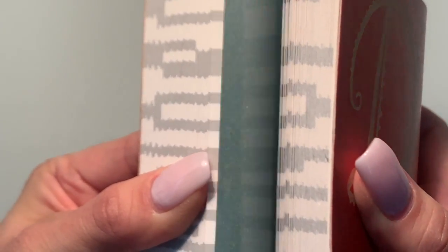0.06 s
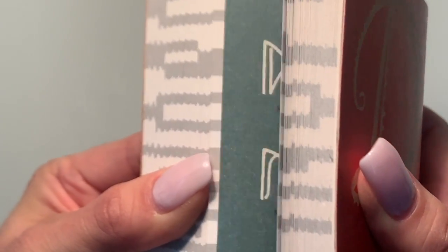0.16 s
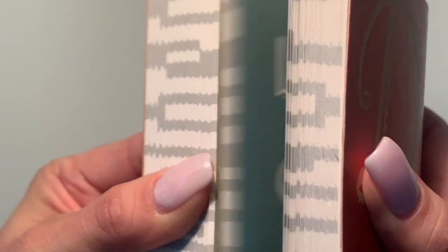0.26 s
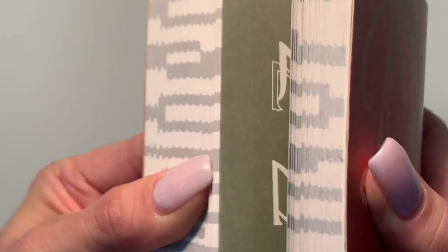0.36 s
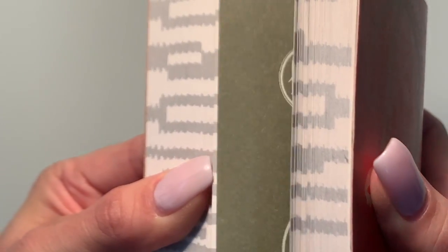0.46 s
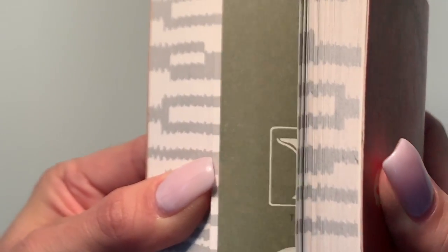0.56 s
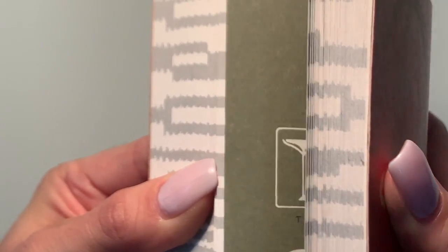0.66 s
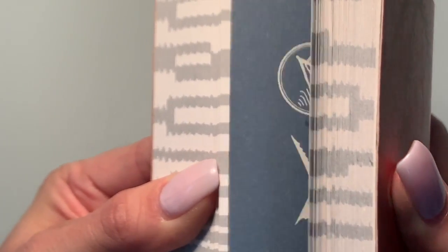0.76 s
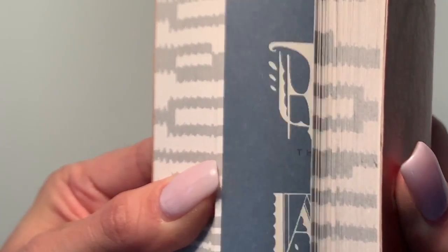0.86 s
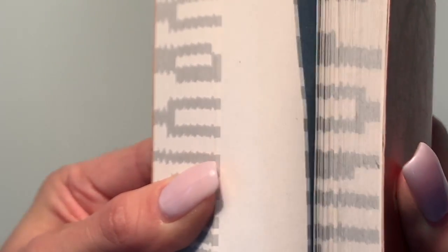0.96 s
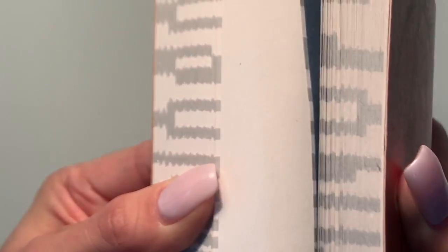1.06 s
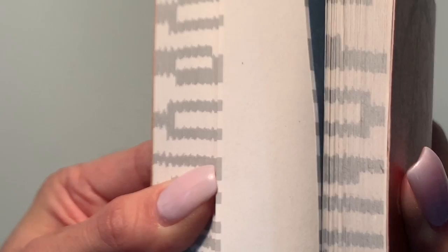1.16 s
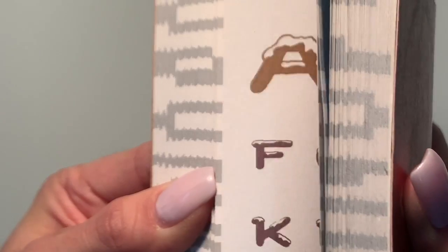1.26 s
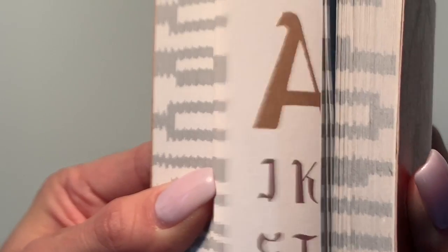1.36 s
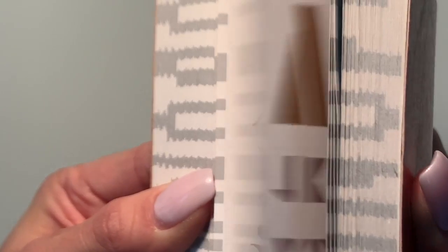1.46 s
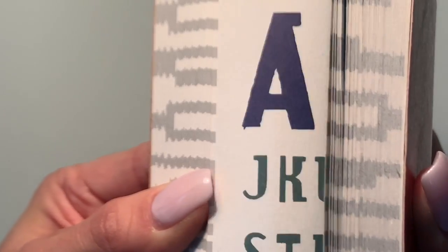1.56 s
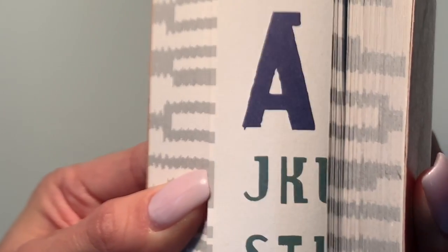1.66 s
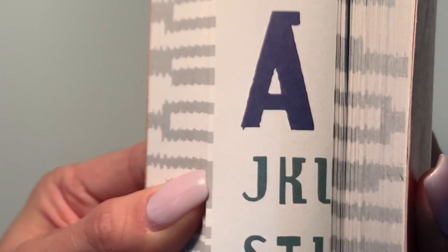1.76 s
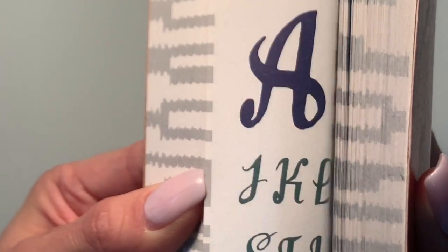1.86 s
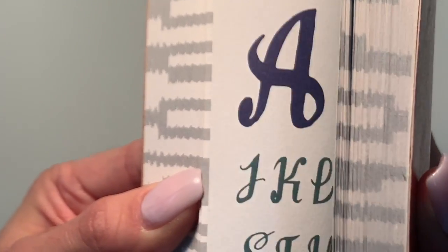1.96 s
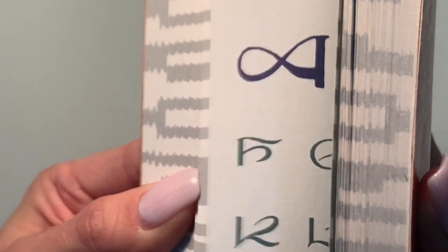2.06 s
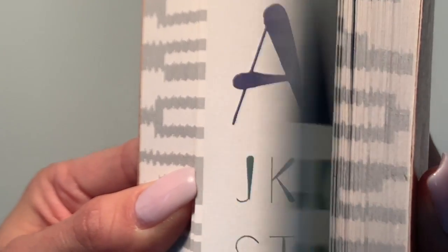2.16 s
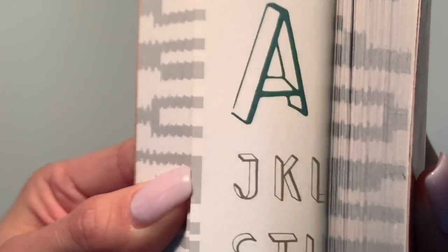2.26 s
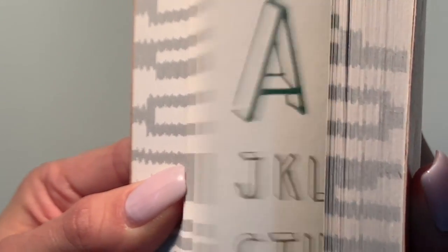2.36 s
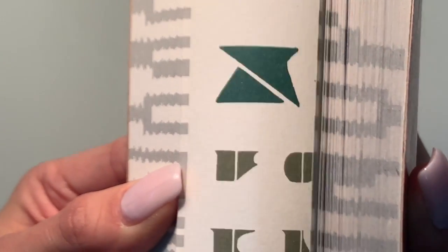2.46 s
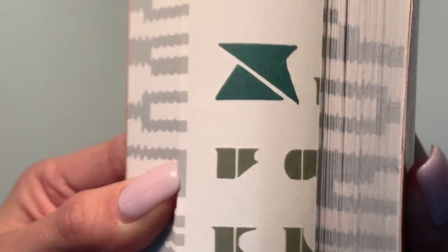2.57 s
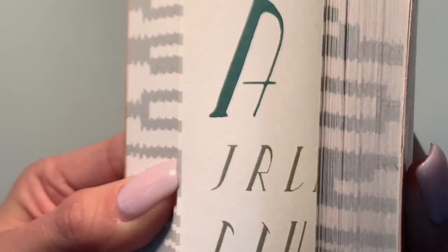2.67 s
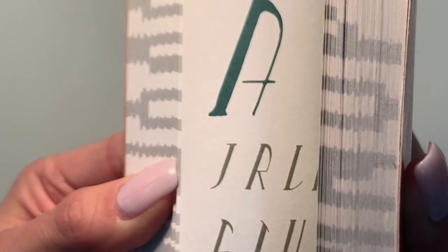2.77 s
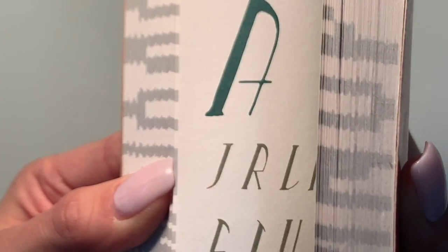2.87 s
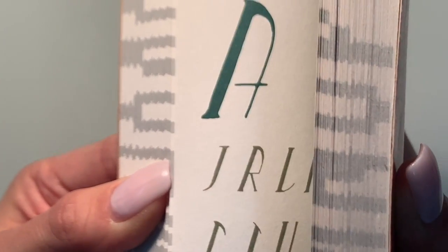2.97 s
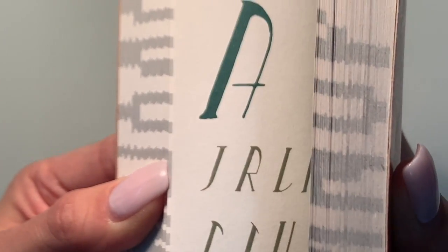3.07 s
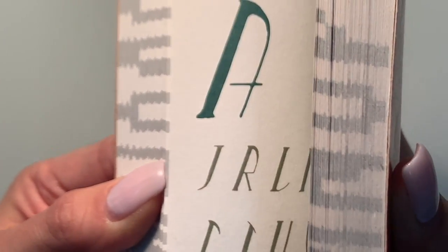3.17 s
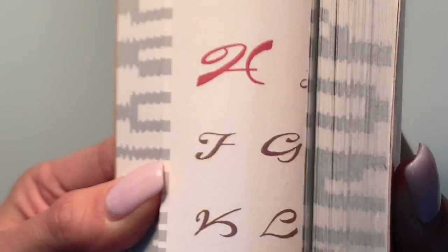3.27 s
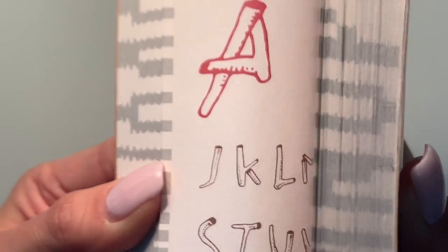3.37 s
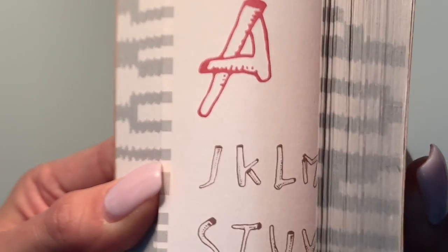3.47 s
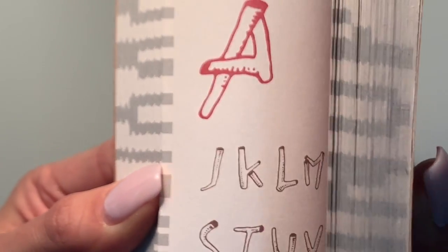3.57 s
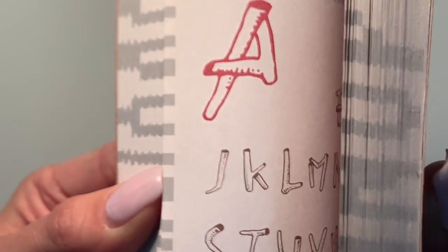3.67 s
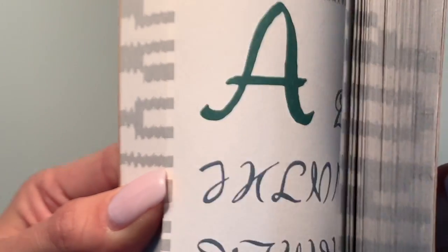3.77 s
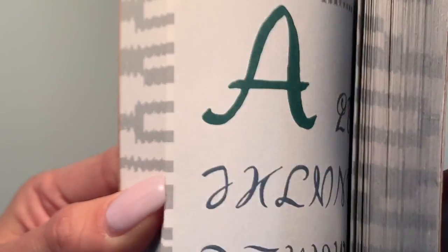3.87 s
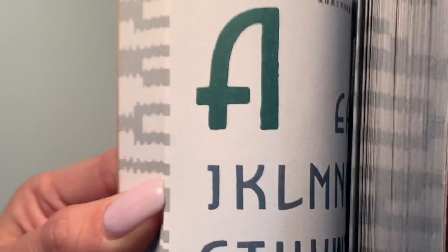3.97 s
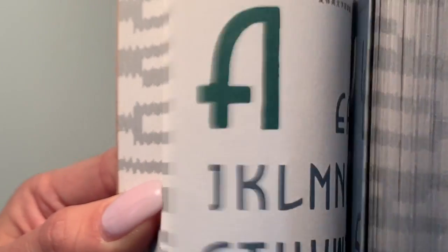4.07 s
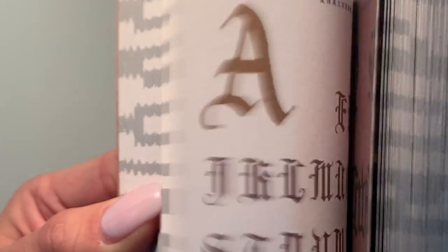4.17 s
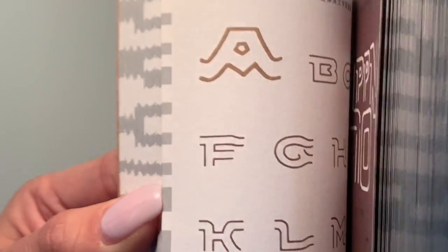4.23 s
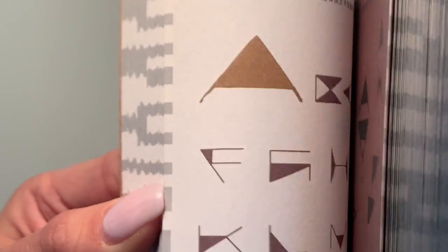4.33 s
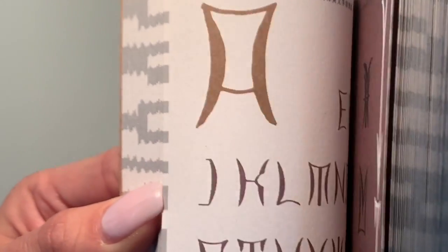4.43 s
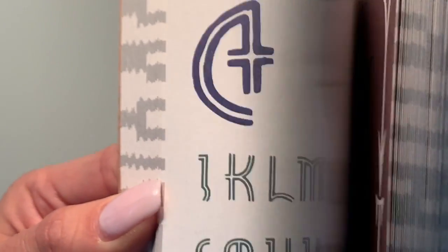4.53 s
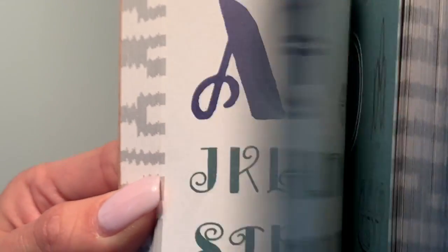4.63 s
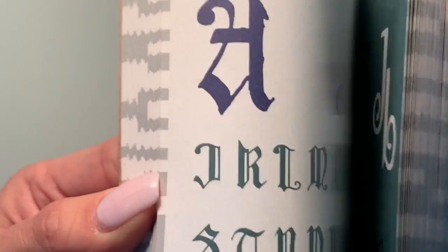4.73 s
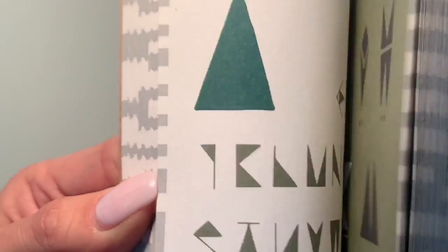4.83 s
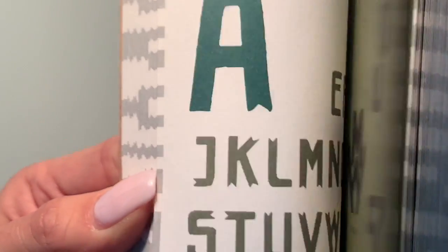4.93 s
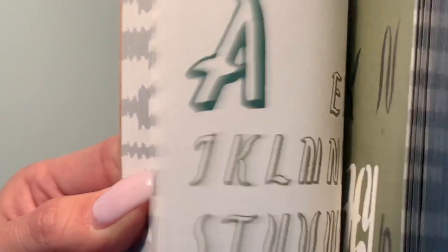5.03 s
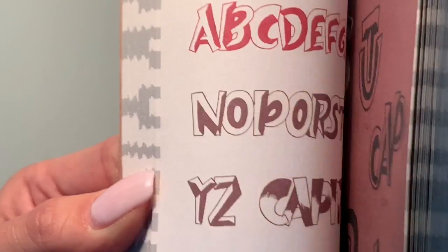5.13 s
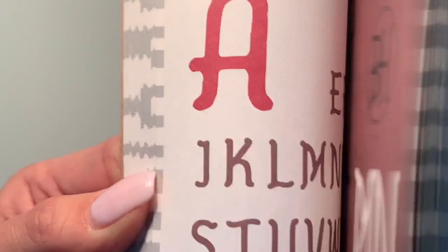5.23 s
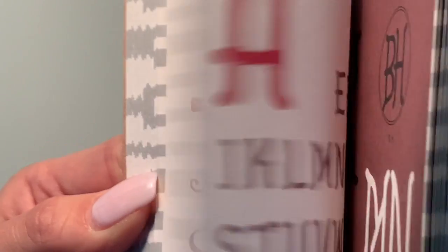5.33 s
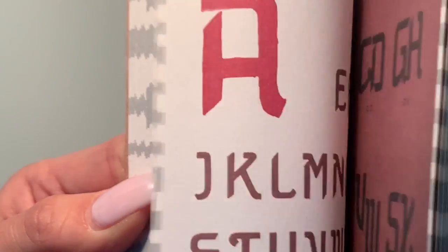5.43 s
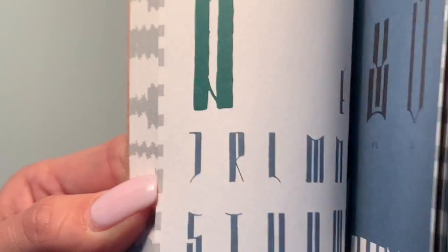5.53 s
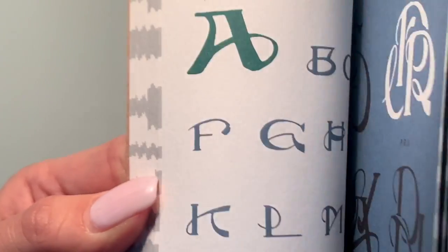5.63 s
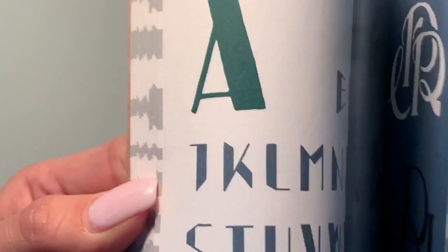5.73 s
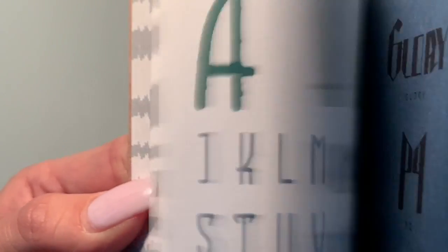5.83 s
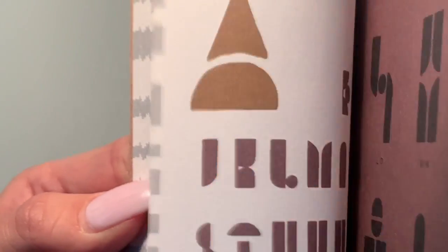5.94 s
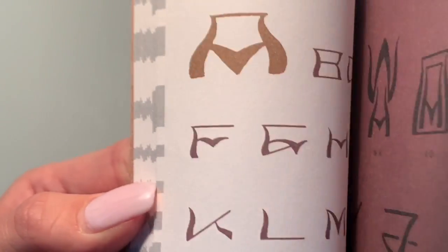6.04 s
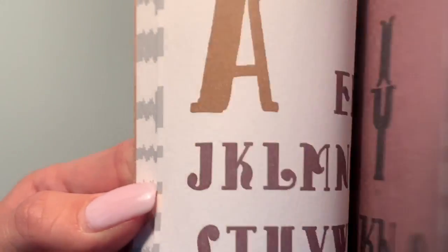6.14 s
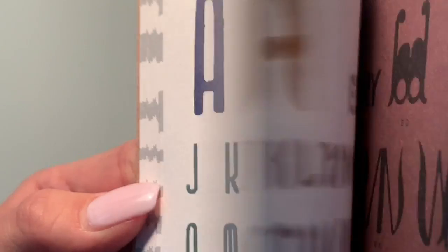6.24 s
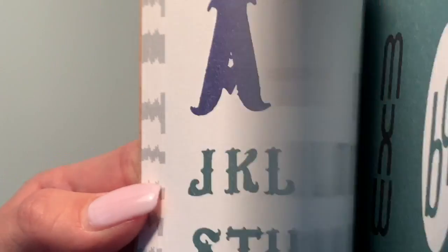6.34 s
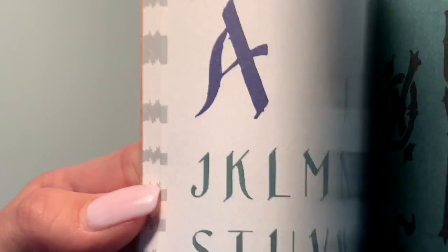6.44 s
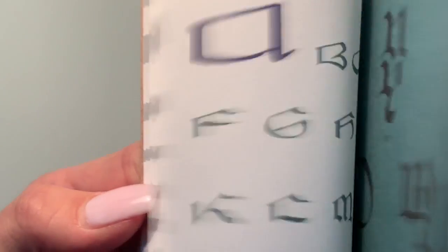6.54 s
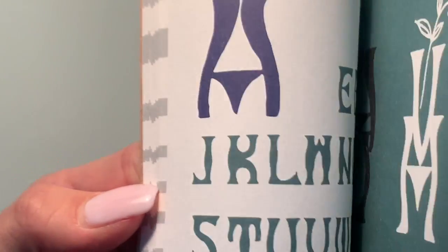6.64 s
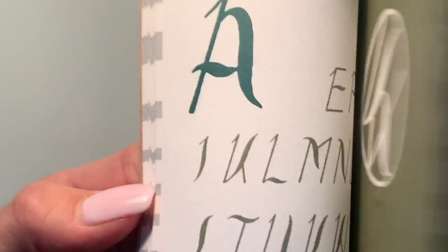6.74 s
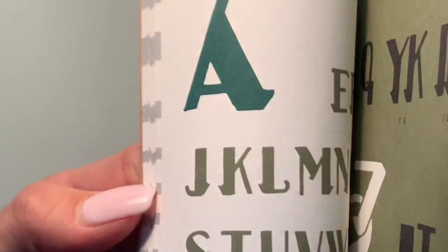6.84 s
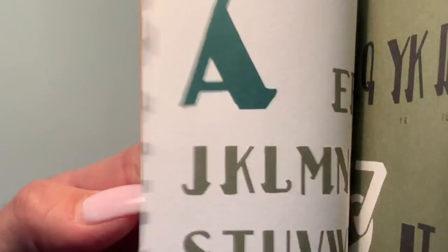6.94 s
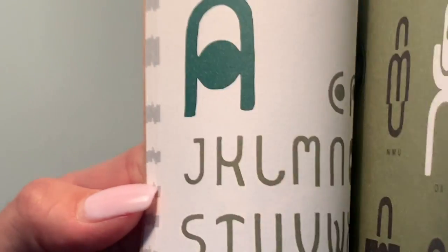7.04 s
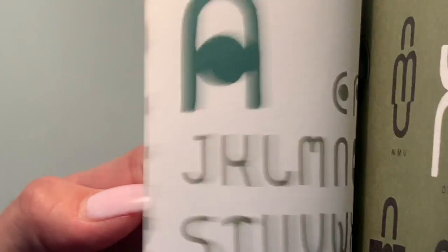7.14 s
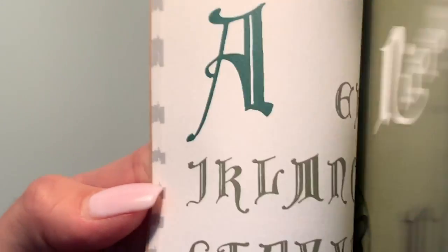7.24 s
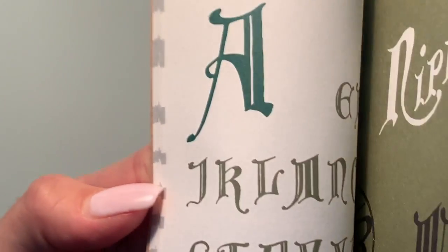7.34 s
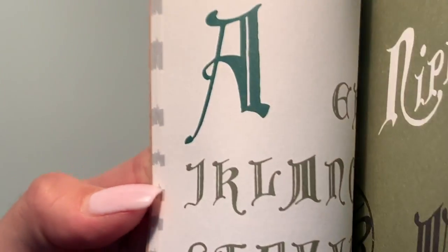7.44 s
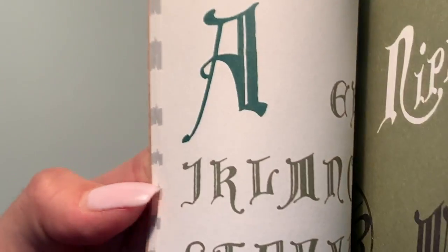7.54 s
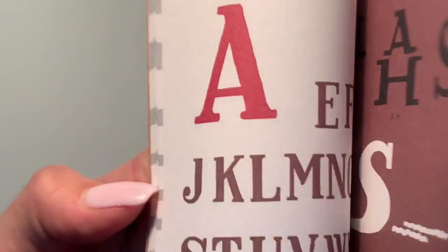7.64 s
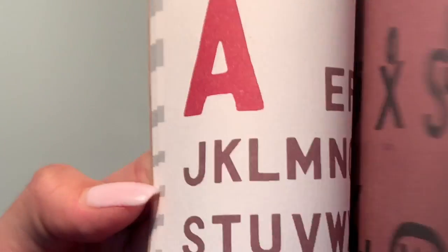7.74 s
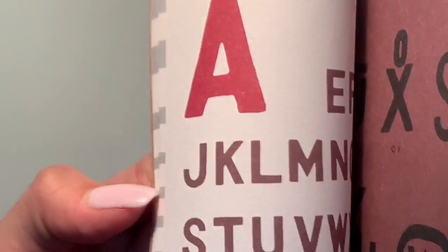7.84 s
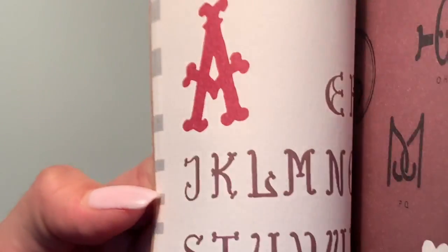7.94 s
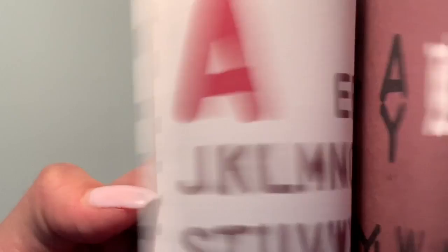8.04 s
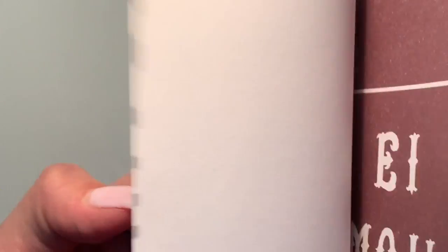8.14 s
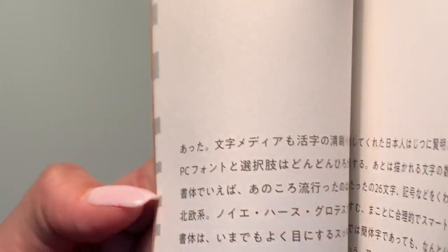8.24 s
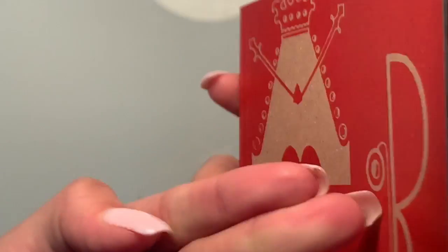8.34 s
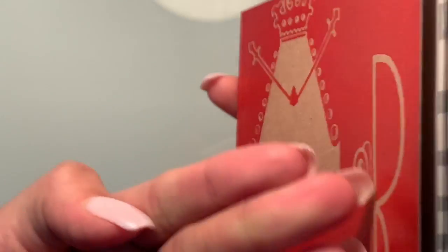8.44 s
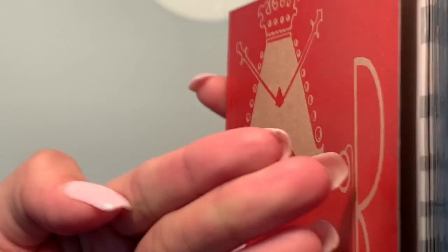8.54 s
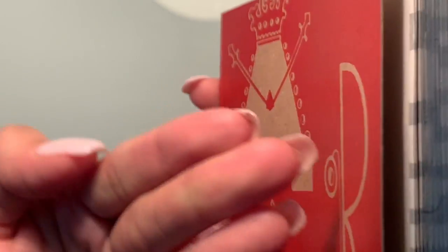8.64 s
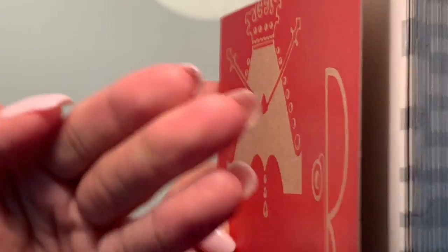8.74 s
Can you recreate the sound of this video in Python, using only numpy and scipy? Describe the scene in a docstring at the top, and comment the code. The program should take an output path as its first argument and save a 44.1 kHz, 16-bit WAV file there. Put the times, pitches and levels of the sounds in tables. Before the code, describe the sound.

A thick paperback is thumbed through with rapid papery ticks and soft air puffs, ending in a sharp closing slap.

```python
"""A dry, close flutter of pages: a thick soft-cover book is riffled under a thumb in a small quiet room.
Each page edge slides along the thumb, scrapes free and snaps straight, wafting a little air.
Some edges only catch with a tick, and bundles of pages push out air in low thumps.
Near the end the pages swing loosely and flap down; the last leaves and the cover slap shut with a thud.
A faint room hum lies under it all."""
import sys
import numpy as np
from scipy import signal
from scipy.fft import rfft, irfft
from scipy.io import wavfile
from scipy.ndimage import uniform_filter1d

SR = 44100
rng = np.random.default_rng(int(sys.argv[2]) if len(sys.argv) > 2 else 0)


def file_out(sig):
    """Save sig as 16-bit WAV at sys.argv[1]."""
    # one column per channel
    cols = np.atleast_2d(sig).T
    # limit, then scale
    lim = np.clip(cols, -1, 1)
    pcm = np.round(lim * 32767).astype(np.int16)
    wavfile.write(sys.argv[1], SR, pcm)


N = 388080

# The thumb's hold. Each row: time in seconds, edge contact from pressed 0 to glancing 1,
# page looseness from 0 to 1, snap against scrape in dB, slide length in seconds.
THUMB_GRIP = [(0, 0.32, 1, -8, 0.021), (1.5, 0.28, 0.32, -8.5, 0.014), (2.1, 0.011, 0.27, -2, 0.016),
              (3.8, 0.27, 0.14, -9.5, 0.02), (4.15, 1, 0.16, -4.5, 0.021), (5.5, 0.63, 0.01, -2.5, 0.023),
              (6.4, 0.68, 0.62, -5, 0.017), (7.0, 0.64, 0.85, -9, 0.014), (8.2, 0.65, 1, -3.5, 0.02)]
# Edges catching on the thumb, pages sliding off it and loose leaves flapping onto the pile.
# Each row: start in seconds, level in dB before each layer's trim.
EDGE_CATCHES = [(0.028, -38), (0.0756, -34), (0.131, -36.5), (0.2246, -30), (0.2882, -32.5),
                (0.4088, -30.5), (0.6021, -32), (0.6984, -34), (0.811, -27.5), (0.82, -33.5),
                (0.906, -33.5), (0.9432, -36.5), (1.134, -34), (1.2392, -36), (1.308, -35), (1.384, -34),
                (1.4564, -38.5), (1.5781, -24.5), (1.624, -36.5), (1.811, -41), (1.9584, -40), (2.4, -26.5),
                (2.4173, -26.5), (2.6093, -34), (3.248, -25.5), (3.37, -27), (3.714, -24.5), (3.7245, -27),
                (3.9139, -21.5), (4.1064, -32.5), (4.205, -25.5), (4.307, -26.5), (4.4001, -27.5),
                (4.5483, -26.5), (4.654, -26), (4.7252, -36), (4.8179, -27), (4.9851, -29.5), (5.0647, -32),
                (5.109, -26.5), (5.2049, -37)]
PAGE_TURNS = [(0.0406, -32.5), (0.0872, -29), (0.145, -29.5), (0.236, -34), (0.298, -33), (0.3435, -29.5),
              (0.417, -29.5), (0.4974, -32.5), (0.561, -27.5), (0.6171, -33.5), (0.714, -32.5),
              (0.7289, -27.5), (0.7996, -30), (0.831, -27), (0.9296, -29), (0.95, -26.5), (1.1549, -32),
              (1.264, -29.5), (1.3409, -25.5), (1.4058, -27.5), (1.494, -27.5), (1.559, -27),
              (1.6752, -30.5), (1.8707, -28.5), (2.024, -26.5), (2.1074, -29.5), (2.183, -27),
              (2.2723, -27.5), (2.4292, -27), (2.617, -30), (3.2586, -26), (3.376, -20), (3.6439, -29.5),
              (3.7316, -21.5), (3.8526, -28.5), (3.9225, -29), (4.0017, -32.5), (4.1168, -29),
              (4.1544, -31), (4.2138, -28), (4.2726, -32), (4.3808, -33.5), (4.474, -34), (4.5588, -26.5),
              (4.6145, -31), (4.744, -27.5), (4.7921, -33.5), (4.8331, -27.5), (4.886, -26), (4.9337, -27),
              (4.9925, -25), (5.072, -28), (5.1147, -26), (5.217, -26.5), (5.2429, -25.5), (5.3653, -27),
              (5.4194, -26), (5.481, -27), (5.6013, -28.5), (5.618, -27.5), (5.7407, -26.5),
              (5.8444, -30.5), (5.8748, -28.5), (5.9789, -29), (6.0158, -27.5), (6.1212, -28.5),
              (6.1931, -28), (6.2571, -31), (6.355, -28.5), (6.447, -28), (6.527, -28.5), (6.573, -29.5),
              (6.7318, -30.5), (6.799, -29.5), (6.979, -28.5), (7.1722, -32), (7.2326, -31), (7.614, -36.5),
              (7.7134, -36.5), (7.896, -38), (8.0231, -38), (8.068, -36), (8.177, -40.5)]
LEAF_FLAPS = [(1.94, -46), (3.415, -51), (3.472, -53), (3.546, -52.5), (6.328, -46.5), (6.384, -48.5),
              (6.415, -48.5), (6.701, -48), (6.747, -40.5), (6.766, -40.5), (6.914, -38.5), (6.964, -42.5),
              (7.036, -37), (7.055, -44.5), (7.156, -41.5), (7.262, -42.5), (7.56, -52), (7.651, -40.5),
              (7.683, -38), (7.733, -43.5), (7.917, -38.5), (7.986, -34), (8.013, -34), (8.035, -34.5),
              (8.252, -37.5), (8.523, -61)]
# The bent leaf's resonance, shifting with the grip. Each row: time in seconds, centre in Hz.
LEAF_RESONANCE = [(3.8, 2350), (4.2, 1120), (5.4, 1220), (5.6, 2180), (6.3, 2370), (6.7, 1390)]
# How hard the pages waft air. Each row: time in seconds, typical puff level in dB.
DRAUGHT_LEVEL = [(0, -55), (1.85, -57.5), (2.03, -45.5), (2.5, -48), (4.1, -58), (5.4, -56), (8.2, -61)]
# Bundles of pages and the cover pushing out air and clapping.
# Each row: time in seconds, level in dB, pitch in Hz, rough half length in cycles.
AIR_THUDS = [(2.299, -34.5, 75, 0.46), (2.615, -25, 92, 0.57), (3.516, -31, 103.3, 0.59),
             (3.576, -28.5, 70, 0.52), (3.923, -27, 120, 0.23), (4.728, -44, 68.4, 1.6),
             (5.043, -47, 56, 2.2), (5.425, -44, 56, 1.16), (6.203, -39.5, 67.6, 0.43),
             (8.323, -19, 200, 0.28), (8.328, -9, 980, 0.39), (8.3367, -8.5, 305, 0.84),
             (8.371, -27.5, 350, 1.1), (8.396, -24, 102.3, 0.65)]
# The last leaves and the cover clapping shut.
# Each row: time in seconds, slap level in dB, scrape level in dB, looseness from 0 to 1.
CLOSING_SLAPS = [(8.3059, -19, -28, 0.92), (8.327, -24, -19.5, 0.8), (8.3572, -42, -37.5, 0.2),
                 (8.3774, -37.5, -57.5, 0.57)]

# Tone colours. Each row: frequency in Hz, relative level in dB.
HUM_EQ = [(20, -6), (60, 2.5), (130, -8), (280, -10), (480, -27.5), (1300, -30), (2100, -37), (3000, -28),
          (4500, -39)]
PRESSED_EDGE_EQ = [(1100, -11.5), (2500, -3), (3100, -9.5), (3800, 3.5), (5000, -6.5), (6900, -1.5),
                   (7900, -15.5), (13500, -11.5), (16000, -28.5)]
GLANCING_EDGE_EQ = [(780, -22.5), (1100, 3.5), (1550, -6), (2200, -5), (3000, -6), (4000, -10), (7500, -9),
                    (9000, 2), (11500, -2.5), (13300, -2.5), (16000, -11)]
TAUT_SNAP_EQ = [(150, -9), (500, -12.5), (800, -17.5), (1080, -1.5), (1500, -10), (1900, -1.5),
                (2300, -5.5), (3000, -14), (4200, -1.5), (9000, -33)]
LOOSE_SNAP_EQ = [(150, -28.5), (330, -5), (580, -2.5), (800, -16), (1080, -5.5), (1400, -3.5), (1850, -15),
                 (2450, -10), (3100, -23), (5000, -36)]
PUFF_EQ = [(20, -27.5), (55, 2), (110, -8.5), (200, -11), (6000, -70)]
CLOSING_SCRAPE_EQ = [(1100, 5.5), (2900, -13.5), (4000, -0.5), (5400, -30.5), (8600, 0.5), (16000, -6.5)]
SHUDDER_EQ = [(70, 3.5), (350, -8.5), (650, -19.5), (2400, -35.5)]
ROOM_TAIL_EQ = [(300, -12.5), (700, -15), (2100, -20), (5000, -18), (13000, -23)]

# The room's decay. Each row: frequency in Hz, seconds to fall by 60 dB.
ROOM_DECAY = [(100, 0.1), (330, 0.33), (800, 0.38), (5000, 0.3)]
# Phase across the microphone pair. Each row: frequency in Hz, the left side's lead in radians.
MIC_PHASE = [(200, 0), (420, .25), (700, 1.2), (1000, 2.8), (1250, 4.2), (1700, 4.7), (1950, 6.2),
             (2150, 8.3), (4000, 10.9), (5000, 11.5), (6500, 13.3), (7600, 12.4), (8600, 9.4),
             (15100, -3.1)]
# Balance across the pair. Each row: frequency in Hz, left minus right in dB.
MIC_BALANCE = [(800, 0), (1050, 3.5), (1350, 10), (1750, 4), (2600, 0)]

LET_GO_S = 0.0017  # a catch, turn or flap hits this long after its start


def from_db(db):
    """Decibels to gain."""
    return 10 ** (np.asarray(db) / 20)


def rms_one(x):
    """Scale to unit rms."""
    return x / np.sqrt(np.mean(x ** 2) + 1e-20)


def with_level(x, db, seconds=0.0033):
    """Give a short stereo sound the energy of this level held for so many seconds."""
    return x * from_db(db) * np.sqrt(2 * seconds * SR / np.sum(x ** 2))


def at_time(rows, s):
    """The columns of a curve at time s."""
    times, *columns = np.transpose(rows)
    return [np.interp(s, times, column) for column in columns]


def at_hz(points, hz):
    """Read a curve on a log-frequency axis."""
    knots, values = np.transpose(points)
    return np.interp(np.log(np.maximum(hz, 1)), np.log(knots), values)


def bins(size):
    """Frequencies of a real FFT."""
    return np.fft.rfftfreq(size, 1 / SR)


def coloured(x, eq, ripple_db=0):
    """Shape x with an EQ curve and optional random ripple, at unit rms."""
    hz, knots = bins(x.shape[-1]), np.geomspace(1000, 16000, 40)
    ripple = at_hz(np.column_stack([knots, rng.standard_normal(len(knots))]), hz)
    gain = from_db(at_hz(eq, hz) + ripple_db * ripple)
    return rms_one(irfft(rfft(x) * gain, x.shape[-1]))


def widened(mid, side, side_db):
    """Left and right from mid and side."""
    return mid + from_db(side_db) * side * [[1], [-1]]


def around(size=4096):
    """Time axis of a short sound in seconds, zero in the middle."""
    return (np.arange(size) - size // 2) / SR


def swell(t, rise_s, fall_s):
    """Exponential rise up to t = 0, exponential fall after it."""
    return np.exp(np.where(t < 0, t / rise_s, -t / fall_s))


def add(track, s, sound):
    """Mix in a short sound with its middle at time s."""
    size = sound.shape[-1]
    start = round(s * SR) - size // 2
    low, high = max(start, 0), min(start + size, N)
    track[..., low:high] += sound[..., low - start:high - start]


def room_hum(level_db=-65.5):
    """A bed of low, nearly mono room noise."""
    mid, side = [coloured(noise, HUM_EQ) for noise in rng.standard_normal((2, N))]
    return from_db(level_db) * widened(mid, side, side_db=-17.5)


def edge_colour(glancing, vary=0.11):
    """An edge pressed into the thumb rasps in the middle treble; a glancing one is hollow and airy."""
    hz = np.geomspace(300, 17000, 120)
    blend = np.clip(glancing + vary * rng.standard_normal(), 0, 1)
    eq_db = (1 - blend) * at_hz(PRESSED_EDGE_EQ, hz) + blend * at_hz(GLANCING_EDGE_EQ, hz)
    return np.column_stack([hz, eq_db])


def fibres(t, eq, grain_db=5.0, slip_db=2.5):
    """Paper friction: fibres catch and let go in tiny clumps and longer slips."""
    grains, slips = [rms_one(uniform_filter1d(rng.standard_normal(len(t)), size)) for size in (24, 130)]
    noise = rng.standard_normal((2, len(t))) * from_db(grain_db * grains + slip_db * slips)
    return widened(*coloured(noise, eq, ripple_db=2.0), side_db=-9.0)


def snap(t, loose, lag_s=0.002754, ring_s=0.0061, ring_db=-24, swish_s=0.028, swish_db=-34, vary_db=3):
    """A bending wave runs through the freed page: lows lag behind, so the snap chirps downward."""
    hz = bins(len(t))
    ripple = rms_one(uniform_filter1d(rng.standard_normal(len(hz)), size=50))  # no two pages bend alike
    eq_db = (1 - loose) * at_hz(TAUT_SNAP_EQ, hz) + loose * at_hz(LOOSE_SNAP_EQ, hz) + vary_db * ripple
    delay_s = lag_s * (500 / np.maximum(hz, 250)) ** 1.7
    chirp = np.exp(-2j * np.pi * np.cumsum(delay_s) * hz[1])
    ring = from_db(ring_db) * swell(t, ring_s, ring_s)  # scattered back from spine and edges
    swish = from_db(swish_db) * swell(t, ring_s, swish_s)  # the whole leaf sweeps through the air
    kick = (t == 0) + (t > 0) * (ring + swish) * rng.standard_normal((2, len(t))) / 2
    low_cut = hz / np.hypot(hz, 150)
    return irfft(rfft(kick) * from_db(eq_db) * chirp * low_cut)


def catches(tick_db=-9.0, bend_db=-8.0, lighter=0.05):
    """An edge flicks lightly against the thumb: a short dry tick that bends the page a little."""
    out, t = np.zeros((2, N)), around()
    for s, db in EDGE_CATCHES:
        glancing, loose, snap_db, _ = at_time(THUMB_GRIP, s)
        tick = fibres(t, edge_colour(glancing + lighter)) * swell(t, rise_s=0.0014, fall_s=0.0011)
        bend = with_level(snap(t, loose), db + snap_db + bend_db)
        add(out, s + LET_GO_S, with_level(tick, db + tick_db) + bend)
    return out


def leaf_resonance(x, centre_hz, boost_db=4.5, width_octaves=0.22):
    """The bent leaf resonates: a narrow bell boost."""
    octaves = np.log2(np.maximum(bins(x.shape[-1]), 1) / centre_hz)
    return irfft(rfft(x) * from_db(boost_db * np.exp(-(octaves / width_octaves) ** 2)))


def pages(scrape_db=-9, release_s=0.0024, slide_lighter=0.28, settle_s=0.046, settle_spread_s=0.0071):
    """Each page slides and rustles, lets go with a scrape and a crack, snaps straight and lands softly."""
    slide_db, rustle_db, crack_db = -11, -24, -3.5  # trims on top of the scrape's
    settle_db = -21  # against the snap
    out, t = np.zeros((2, N)), around(size=8192)
    for (start, db), late in zip(PAGE_TURNS, rng.standard_normal(len(PAGE_TURNS))):
        glancing, loose, snap_db, slide_s = at_time(THUMB_GRIP, start)
        leaf_hz, = at_time(LEAF_RESONANCE, start)
        s, edge_db = start + LET_GO_S, db + scrape_db
        slide_eq, release_eq = edge_colour(glancing + slide_lighter), edge_colour(glancing)
        slide = fibres(t, slide_eq) * np.exp(-(t / np.where(t < 0, slide_s, release_s)) ** 2)
        scrape = fibres(t, release_eq) * swell(t, rise_s=0.0036, fall_s=release_s)
        crack = fibres(t, release_eq) * swell(t, rise_s=0.00037, fall_s=0.00037)
        rustle = fibres(t, TAUT_SNAP_EQ) * swell(t, rise_s=0.0079, fall_s=0.024)
        friction = from_db(edge_db + slide_db) * slide + from_db(edge_db + rustle_db) * glancing * rustle
        release = with_level(scrape, edge_db) + with_level(crack, edge_db + crack_db)
        straighten = with_level(snap(t, loose), edge_db + snap_db)
        add(out, s, leaf_resonance(friction + release + straighten, leaf_hz))
        landing = with_level(snap(around(), loose=0.84), edge_db + snap_db + settle_db)
        add(out, s + settle_s + settle_spread_s * late, landing)
    return out


def draught(vary_db=4.1):
    """Each turning page wafts a soft puff of air at the microphone."""
    out, t = np.zeros(N), around(size=16384)
    for s, _ in PAGE_TURNS:
        db, = at_time(DRAUGHT_LEVEL, s)
        gain = from_db(db + vary_db * rng.standard_normal())
        puff = coloured(rng.standard_normal(len(t)), PUFF_EQ) * swell(t, rise_s=0.025, fall_s=0.034)
        add(out, s, gain * puff)
    return out


def flaps(trim_db=-2):
    """A free leaf lands flat: a clean, hollow bending wave."""
    out, t = np.zeros((2, N)), around()
    for s, db in LEAF_FLAPS:
        flap = snap(t, loose=0.85, lag_s=0.0035, ring_db=-36, swish_db=-33, vary_db=1.3)
        add(out, s + LET_GO_S, with_level(flap, db + trim_db))
    return out


def thuds(rise=0.56, fall=0.98):
    """Air squeezed from between the leaves: a brief pressure swing that builds fast and dies."""
    out, t = np.zeros(N), around(size=16384)
    for s, db, hz, cycles in AIR_THUDS:
        half_lengths = np.clip(t * hz / cycles, -50, 50)
        envelope = 2 / (np.exp(-half_lengths / rise) + np.exp(half_lengths / fall))
        add(out, s, from_db(db) * np.cos(2 * np.pi * hz * t) * envelope)
    return out


def closing():
    """The book claps shut: each leaf scrapes past its neighbours and slaps flat."""
    out, t = np.zeros((2, N)), around()
    for s, slap_db, scrape_db, loose in CLOSING_SLAPS:
        scrape = fibres(t, CLOSING_SCRAPE_EQ) * swell(t, rise_s=0.0008, fall_s=0.0009)
        slap = snap(t, loose, swish_db=-34.5)
        add(out, s, with_level(scrape, scrape_db) + with_level(slap, slap_db))
    return out


def shudder(peak_s=8.342, level_db=-31.5):
    """The shut block of leaves shudders: a short, dull rush of noise."""
    out, t = np.zeros(N), around(size=32768)
    rush = coloured(rng.standard_normal(len(t)), SHUDDER_EQ) * swell(t, rise_s=0.01, fall_s=0.044)
    add(out, peak_s, from_db(level_db) * rush)
    return out


def room_reverb(x, build_s=0.004):
    """The small room's diffuse tail dies band by band, partly alike in both ears."""
    t = np.arange(SR // 2) / SR
    hz, band_edges = bins(len(t)), np.geomspace(40, 20000, 13)
    mid, side = rfft(rng.standard_normal((2, len(t))))
    spectrum = widened(mid, side, side_db=-4.5) * from_db(at_hz(ROOM_TAIL_EQ, hz))
    tail = 0
    for low, high in zip(band_edges, band_edges[1:]):
        band = irfft(spectrum * (hz >= low) * (hz < high), len(t))
        t60 = at_hz(ROOM_DECAY, np.sqrt(low * high))
        envelope = from_db(-60 * t / t60) * (1 - np.exp(-t / build_s))
        tail = tail + band * envelope / np.linalg.norm(envelope)
    return signal.fftconvolve(x.mean(axis=0)[None], tail)[:, :N]


def scene():
    """The book and its reverb over the room's hum, with the draught left dry."""
    book = pages() + catches() + flaps() + closing() + shudder() + thuds()
    return room_hum() + book + room_reverb(book) + draught()


def record(dry, cutoff_hz=16300):
    """Two microphone ports differ in phase and level by frequency; the top is cut."""
    hz, sides = bins(N), np.array([[.5], [-.5]])
    pair = from_db(sides * at_hz(MIC_BALANCE, hz)) * np.exp(1j * sides * at_hz(MIC_PHASE, hz))
    pair /= np.sqrt(np.mean(np.abs(pair) ** 2, axis=0))  # constant power across the pair
    high_cut = signal.ellip(10, .3, 80, cutoff_hz, fs=SR, output="sos")
    return signal.sosfilt(high_cut, irfft(rfft(dry) * pair, N))


dry = scene()
out = record(dry)
file_out(out)
```